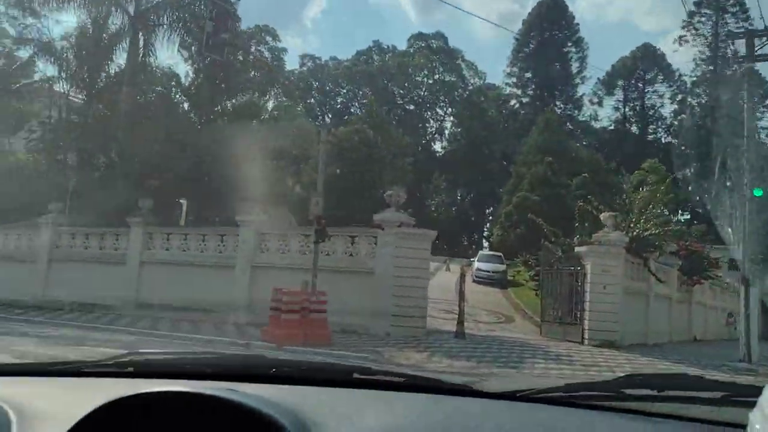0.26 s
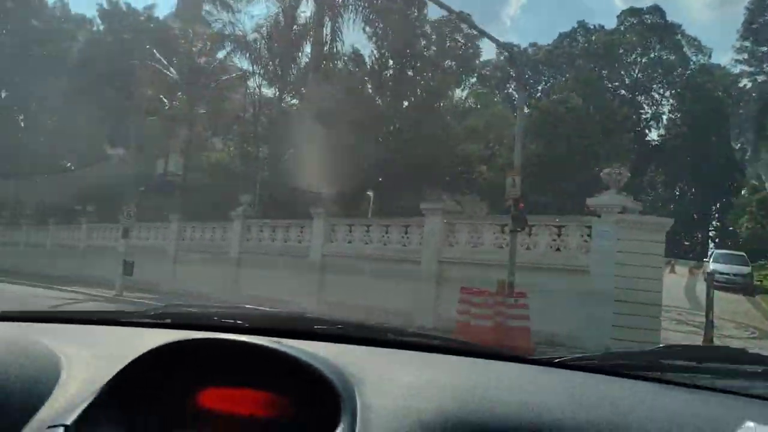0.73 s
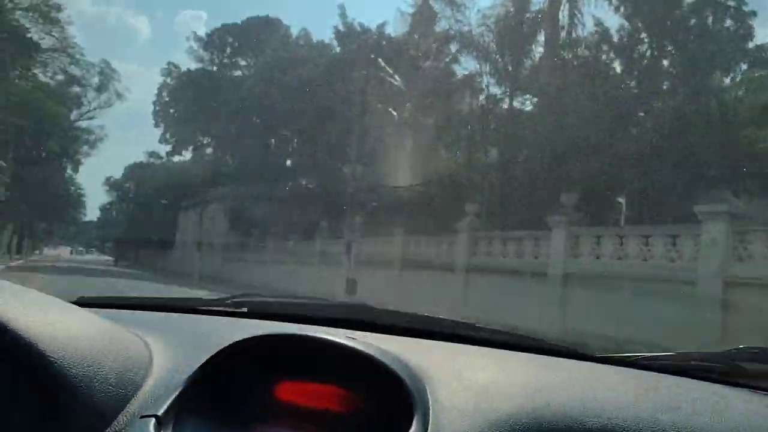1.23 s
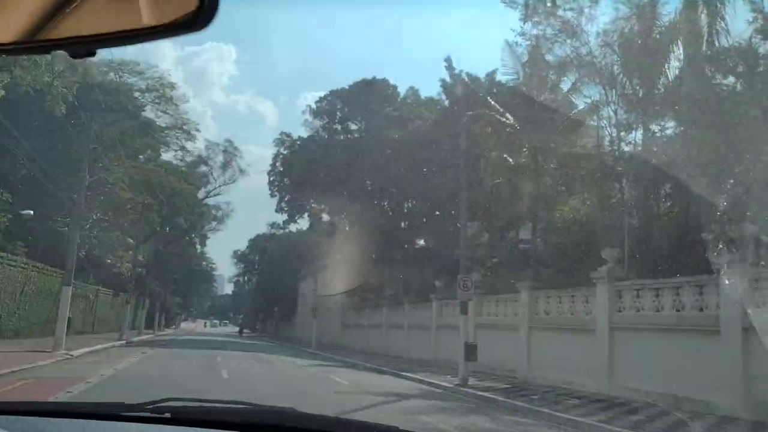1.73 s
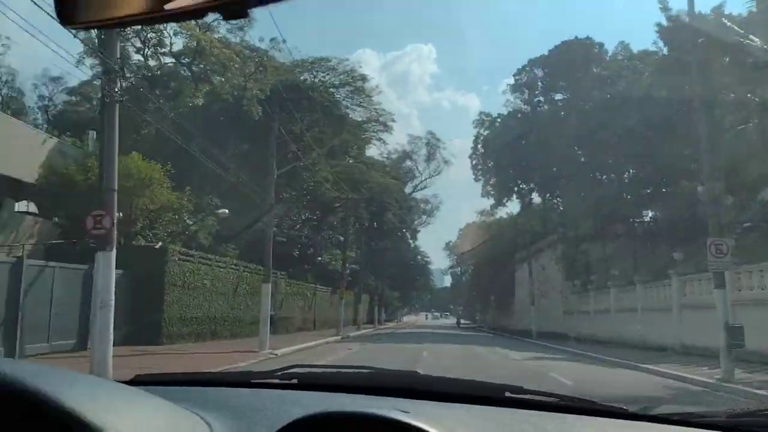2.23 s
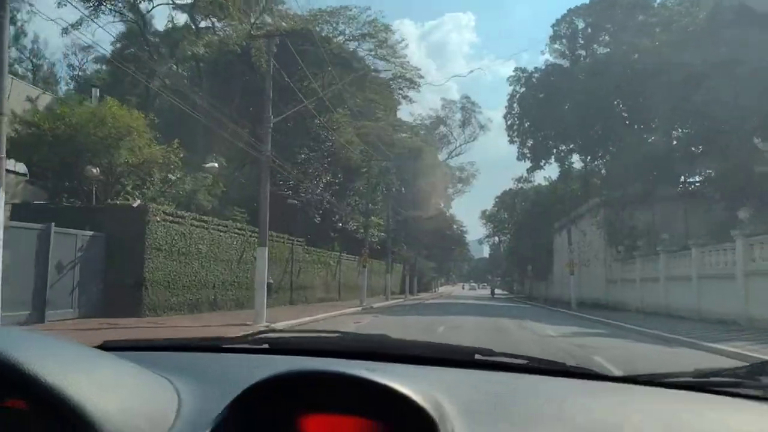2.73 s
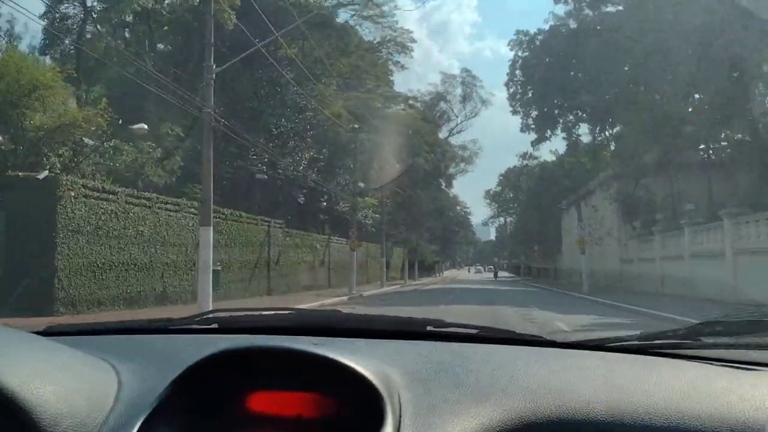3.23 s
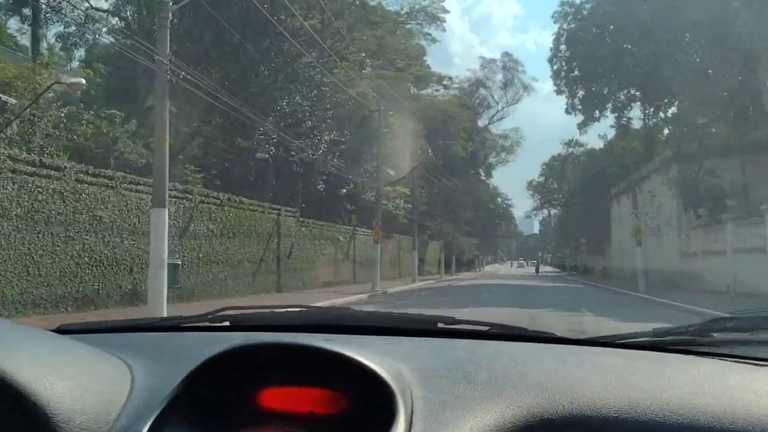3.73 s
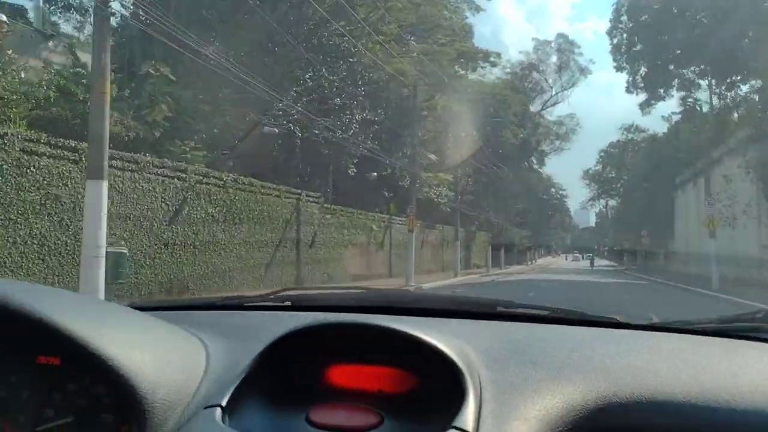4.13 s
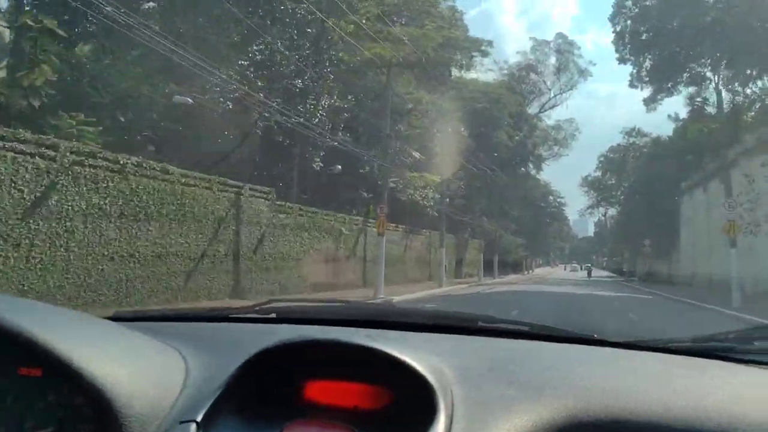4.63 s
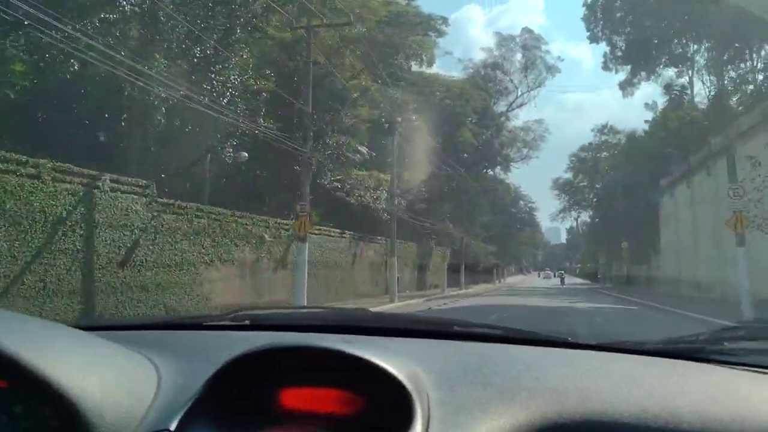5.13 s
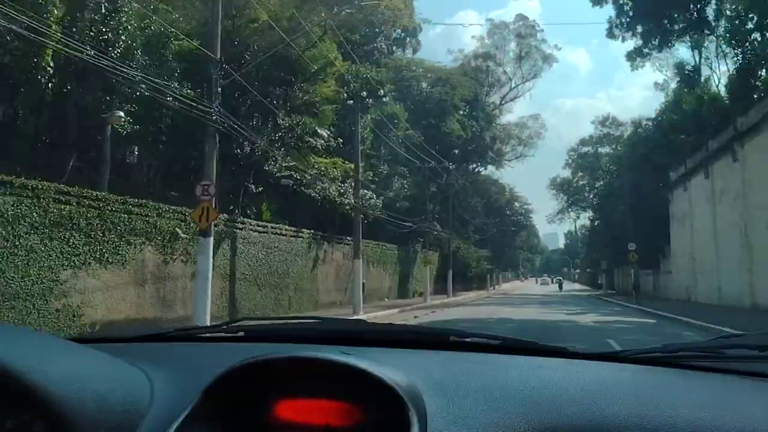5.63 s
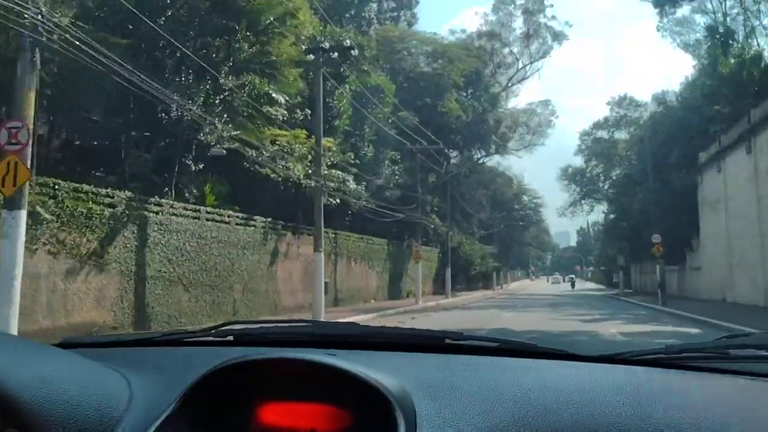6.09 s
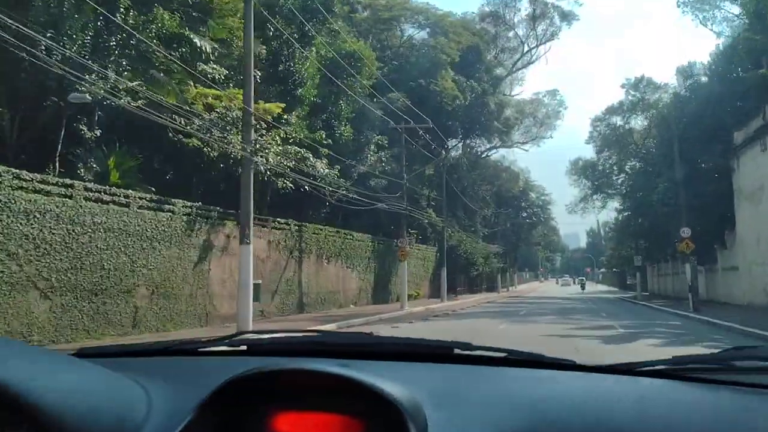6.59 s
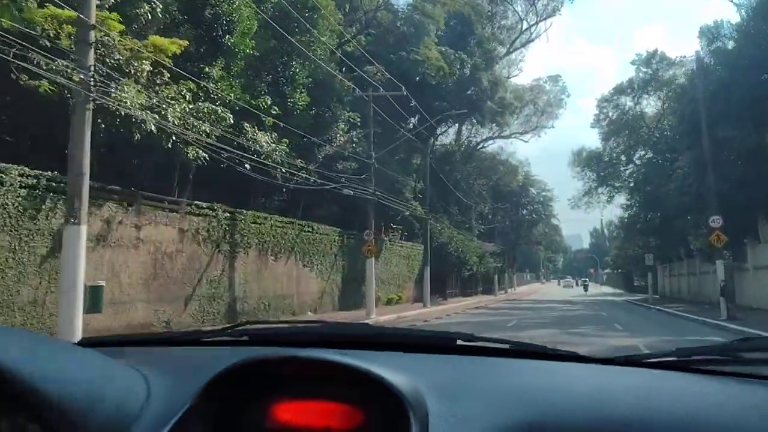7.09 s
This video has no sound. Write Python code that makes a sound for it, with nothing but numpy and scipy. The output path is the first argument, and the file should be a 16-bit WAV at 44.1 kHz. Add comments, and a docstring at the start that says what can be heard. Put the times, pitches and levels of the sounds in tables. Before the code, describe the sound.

Close, boomy cabin sound of a four-cylinder car with a loud open exhaust. Low lugging burble first, small plastic ticks and a soft bump, then a smooth rise in revs, easing briefly midway before a hard, rasping pull. Loose panels buzz at the peak, the gas hiss drops away, and the engine hums on high, ending with several thuds and a stumble.

```python
"""A four-cylinder car with a straight-through exhaust, heard on a phone inside the cabin.
It lugs through a corner, then pulls up through the revs with rising rasp and hiss until the throttle eases.
Firing orders are swept sines shaped by the cabin; exhaust notes are filtered pulses and pulsing noise.
Gas, burble, body rumble and tyres are coloured noise; trim ticks, and bumps thud and shake loose panels."""
import sys
import numpy as np
from scipy import signal
from scipy.fft import rfft, irfft
from scipy.io import wavfile
from scipy.ndimage import uniform_filter1d, minimum_filter1d

SR = 44100
rng = np.random.default_rng(int(sys.argv[2]) if len(sys.argv) > 2 else 0)


def store_pcm(level_fs):
    """Save levels as 16-bit WAV."""
    pcm = np.round(np.clip(level_fs, -1, 1) * 32767).astype(np.int16)
    wavfile.write(sys.argv[1], SR, np.atleast_2d(pcm).T)


N = 324135
T = np.arange(N) / SR

# engine stumbles: boom dips, burble swells: (time [s], half length [s], burble level [dB])
ENGINE_STUMBLES = [(1.165, 0.054, -41), (6.17, 0.07, -26), (7.153, 0.12, -18.5)]
REFERENCE_HZ = 80  # firing rate from which boom and tyre levels are scaled


def undb(db):
    """Decibels to gain."""
    return 10 ** (np.asarray(db) / 20)


def unit(x):
    """Scale to rms 1."""
    return x / np.sqrt(np.mean(x ** 2))


def curve(table):
    """Join (time, value) points by straight lines."""
    time_s, value = np.transpose(table)
    return np.interp(T, time_s, value)


def colour(x, spectrum):
    """Filter by (Hz, dB) points, 12 dB per octave steeper beyond the ends; rms 1."""
    point_hz, point_db = np.transpose(spectrum)
    f = np.maximum(np.fft.rfftfreq(N, 1 / SR), 1)
    skirts = (np.minimum(f / point_hz[0], 1) * np.minimum(point_hz[-1] / f, 1)) ** 2
    gain = undb(np.interp(np.log(f), np.log(point_hz), point_db)) * skirts
    return unit(irfft(rfft(x) * gain, N))


def walk(rate_hz):
    """Smooth random drift with about rate_hz new values a second; rms 1."""
    hold = int(SR / rate_hz)
    steps = np.repeat(rng.standard_normal(N // hold + 1), hold)[:N]
    return unit(uniform_filter1d(steps, hold))


def pan(left_over_right_db):
    """Left and right gains for a level difference."""
    return undb(np.array([[left_over_right_db], [-left_over_right_db]]) / 2)


def ring(start_s, t60_s, rise_s):
    """Envelope of something knocked: quick rise, exponential decay."""
    t = np.maximum(T - start_s, 0)
    return undb(-60 * t / t60_s) * (1 - np.exp(-t / rise_s))


def rise(hz, centre_hz, width_hz):
    """Soft switch from 0 to 1 as the firing rate passes a threshold."""
    return 1 / (1 + np.exp((centre_hz - hz) / width_hz))


def swell(centre_s, half_s):
    """Bell-shaped envelope."""
    return np.exp(-((T - centre_s) / half_s) ** 2)


def ports(x, diffuse_db):
    """Direct sound reaches the right port first; scattered sound follows its loudness, unlike at each port."""
    lag_samples = 22
    loudness = np.sqrt(np.abs(uniform_filter1d(x ** 2, size=100)))
    direct = np.array([np.roll(x, lag_samples), x])
    return direct + undb(diffuse_db) * loudness * rng.standard_normal((2, N))


def cabin(x, wet_db, t60_s, lag_s, apart):
    """Short reflections off glass and seats smear pulses in time (phase only), a little differently at each port."""
    t = T[:SR // 5]
    echoes = rng.standard_normal((3, len(t))) * undb(-60 * t / t60_s)
    echoes = echoes / np.sqrt(np.sum(echoes ** 2, axis=1, keepdims=True))
    echoes = rfft(echoes, N)
    shared_turn = np.angle(1 + undb(wet_db) * echoes[0])
    port_turns = np.angle(1 + apart * echoes[1:])
    left, right = irfft(rfft(x) * np.exp(1j * (shared_turn + port_turns)), N)
    return np.array([np.roll(left, round(lag_s * SR)), right])  # right port leads


def firings(turns, scatter_db, jitter_s, cylinder_db):
    """One pulse a firing; the four cylinders differ a little, and so does every cycle."""
    times_s = np.interp(np.arange(1, int(turns[-1])), turns, T)
    chance = rng.standard_normal((len(times_s), 2))
    cylinders = np.resize([0.23, -1.03, 0.39, -0.61], len(times_s))
    size = undb(scatter_db * chance[:, 0] + cylinder_db * cylinders)
    at = np.round((times_s + jitter_s * chance[:, 1]) * SR)
    return np.bincount(np.clip(at, 0, N - 1).astype(int), size, N)


def puffs(turns, depth, grain_db):
    """Turbulence that swells once a firing and comes in small grains."""
    pulsing = 1 + depth * np.cos(2 * np.pi * turns)
    return rng.standard_normal(N) * pulsing * undb(grain_db * walk(700))


def road(hz):
    """The body rumbles on its springs; tyre roar grows with the firing rate, as they turn with the engine."""
    # body rumble, strongest in the corner: (time [s], level [dB])
    rumble_level = [(0, -41), (.3, -16.5), (1.2, -17), (1.8, -16.5), (2.7, -28), (4.2, -27), (5.3, -35),
                    (6.4, -25), (7.35, -20.5)]
    # rumble spectrum: (frequency [Hz], density [dB per Hz])
    body_spectrum = [(12, -11), (24, -5.5), (31, -1), (40, -4), (100, -19.5)]
    # tyre spectrum: (frequency [Hz], density [dB per Hz])
    tyre_spectrum = [(100, -3), (350, 6), (600, -5), (1000, -13.5), (1500, -10), (2050, -9), (3000, -17.5),
                     (6000, -31), (10000, -22.5), (15000, -33)]
    tyre_ref_db, tyre_db_per_octave = -37.5, 11.5
    tyre_db = tyre_ref_db + tyre_db_per_octave * np.log2(hz / REFERENCE_HZ)
    rumble = colour(rng.standard_normal(N), body_spectrum)
    tyres = colour(ports(rng.standard_normal(N), diffuse_db=4.5), tyre_spectrum)
    return rumble * undb(curve(rumble_level)) + tyres * undb(tyre_db + 1.4 * walk(6))


def thuds():
    """Jolts ring the cabin air as decaying sines and knock on the floor pan as noise bursts."""
    # jolts: (time [s], pitch [Hz], level before rise [dB], 60 dB decay [s])
    jolts = [(1.033, 64.5, -2.5, 0.57), (6.145, 76.6, 0, 0.15), (7.047, 75, -5.5, 0.4),
             (7.175, 88, -3.5, .14), (7.217, 292, -2.5, 0.041)]
    floor_spectrum = [(150, -7.5), (290, -1), (550, -15.0), (900, -30)]  # Hz, dB per Hz
    air, knocks = 0, 0
    for start_s, pitch_hz, db, t60_s in jolts:
        tone = np.sin(2 * np.pi * pitch_hz * (T - start_s))
        air = air + undb(db) * ring(start_s, t60_s, rise_s=0.0035) * tone
        knocks = knocks + undb(db) * ring(start_s, t60_s=0.19, rise_s=0.00056)
    floor = colour(ports(rng.standard_normal(N), diffuse_db=-0.5), floor_spectrum)
    return air + knocks * undb(-13.5) * floor


def trim(turns):
    """Plastic trim ticks as the body twists, and loose panels buzz when shaken: noise under knock envelopes."""
    # ticks: (time [s], level before rise [dB], 60 dB decay [s])
    tick_events = [(0.638, -23.5, 0.017), (.864, -35, 0.041), (0.877, -32.5, 0.036), (1.032, -29.5, 0.073),
                   (1.357, -25.5, 0.084), (7.045, -32, 0.04)]
    # panel buzzes: (time [s], level before rise [dB], 60 dB decay [s], rise [s])
    buzz_events = [(1.36, -35, 0.37, 0.0028), (5.89, -8, 0.73, 0.088), (5.955, -12, 0.099, 0.019),
                   (7.109, -24, 0.38, 0.0036), (7.212, -15.5, 0.36, 0.019)]
    # trim spectrum: (frequency [Hz], density [dB per Hz])
    trim_spectrum = [(300, -13), (900, -6), (1600, 0.5), (2200, -1), (3000, -6), (4200, -6.5), (6500, -12),
                     (10000, -9.5), (15000, -27)]
    ticks = sum(undb(db) * ring(s, t60_s, rise_s=0.0002) for s, db, t60_s in tick_events)
    shake = sum(undb(db) * ring(s, t60_s, rise_s) for s, db, t60_s, rise_s in buzz_events)
    buzz = colour(ports(puffs(turns, depth=0.075, grain_db=0.5), diffuse_db=2.5), trim_spectrum)
    plastic = colour(rng.standard_normal((2, N)), trim_spectrum)
    return ticks * plastic * pan(2.2) + shake * buzz


def gas(turns, throttle):
    """Gas rushes louder as the throttle opens, fluttering with the firings; brighter at the right port."""
    # rush spectrum: (frequency [Hz], density [dB per Hz])
    gas_spectrum = [(700, -0.5), (1500, -1.5), (2200, 3.5), (3000, -2), (4000, 0), (5100, -6), (6300, -4.5),
                    (7300, -6.5), (8800, -1.5), (10400, 3.5), (12000, -3.5), (15500, -14.5)]
    shut_db, opening_db = -45.5, 19  # throttle shut; added when wide open
    flow = colour(ports(puffs(turns, depth=0.049, grain_db=1.5), diffuse_db=9.5), gas_spectrum)
    top = signal.sosfilt(signal.butter(1, 6000, "high", fs=SR, output="sos"), flow)
    flow = flow + (pan(-6) - 1) * top
    return flow * undb(shut_db + opening_db * throttle + 0.74 * walk(25))


def burble(turns, lugging):
    """Uneven combustion fills the gaps between orders with noise when the engine lugs or stumbles."""
    # shared part's spectrum: (frequency [Hz], density [dB per Hz])
    pipe_spectrum = [(30, -9), (60, 5.5), (110, 10.5), (270, 0.5), (330, -2.5), (400, -8.5), (700, -28)]
    apart_spectrum = [(180, -12), (280, 10.5), (350, -19.5), (450, -12)]  # Hz, dB per Hz
    smooth_db, lug_db = -34, 10.5  # running smoothly; added when lugging
    shared = colour(puffs(turns, depth=0.36, grain_db=-4), pipe_spectrum)
    apart = colour(rng.standard_normal((2, N)), apart_spectrum)  # differs between the ports
    stumbling = sum(undb(db) * swell(s, half_s) for s, half_s, db in ENGINE_STUMBLES)
    return (shared + undb(-1.5) * apart) * (undb(smooth_db + lug_db * lugging) + stumbling)


def exhaust(hz, turns, throttle, lugging, bark_db):
    """Firings growl when lugging or coasting, bark when pulling; at high revs their fronts ring the thin pipe."""
    # growl spectrum: (frequency [Hz], density [dB per Hz])
    growl_spectrum = [(300, 5), (360, -6), (440, 0), (505, 5), (570, -15.5), (650, -9), (1000, -30)]
    # bark spectrum: (frequency [Hz], density [dB per Hz])
    bark_spectrum = [(330, -10.5), (440, 4.5), (510, -5), (600, 6), (700, -1), (860, -4), (1100, -10.5),
                     (1500, -26)]
    # pipe wall rasp spectrum: (frequency [Hz], density [dB per Hz])
    rasp_spectrum = [(750, -10), (900, -7), (1100, -0.5), (1300, 5), (1490, 0.5), (1700, -12), (2150, -10),
                     (3100, -37), (4000, -13.5), (5500, -26)]
    # whistle spectrum: (frequency [Hz], density [dB per Hz])
    whistle_spectrum = [(1200, -2.5), (1370, 1), (1430, 9), (1500, -7), (1700, -20)]
    growl_db, growl_lug_db = 2.5, 2  # relative to bark; added when lugging
    rasp_shut_db, rasp_opening_db = -43, 17  # throttle shut; added when wide open
    racing = rise(hz, centre_hz=90.1, width_hz=1.9)
    pulling = rise(hz, centre_hz=61.8, width_hz=2.9) * (1 - racing * (1 - throttle))

    even = 1 / np.sqrt(hz)  # equal power at every firing rate
    blows = unit(even * firings(turns, scatter_db=2.0, jitter_s=.00003, cylinder_db=-1.0))
    rough = unit(puffs(turns, depth=0.21, grain_db=-0.5)) * hz / hz.mean()  # faster gas is rougher
    blows = cabin(blows + undb(-8) * rough, wet_db=8, t60_s=.05, lag_s=.0003, apart=.5)

    growl_noise = ports(unit(puffs(turns, depth=0.45, grain_db=4.0)), diffuse_db=-3)
    growl = colour(blows + undb(-7) * growl_noise, growl_spectrum)
    growl = growl * undb(growl_db + growl_lug_db * lugging)
    note = (1 - pulling) * growl + pulling * colour(blows, bark_spectrum)

    fronts = even * firings(turns, scatter_db=1.2, jitter_s=.00001, cylinder_db=1.5)
    fronts = cabin(fronts, wet_db=1, t60_s=.025, lag_s=.00052, apart=.6)
    rasp = colour(fronts, rasp_spectrum) * undb(2 * walk(14))
    rasp = racing * rasp * undb(rasp_shut_db + rasp_opening_db * throttle)

    # faint wavering whistle once the engine runs freely
    whistle = colour(ports(rng.standard_normal(N), diffuse_db=-16.0), whistle_spectrum)
    whistle = unit(whistle * undb(3.6 * walk(25)))
    whistle = whistle * rise(hz, centre_hz=59.2, width_hz=0.77) * undb(-44)
    return note * undb(bark_db) + rasp + whistle


def boom(hz, turns, bark_db):
    """Low firing orders sweep through the cabin's standing waves; harder firings favour the upper ones."""
    # orders 1 to 6: (reference level before cabin response [dB], slope [dB per octave of revs],
    # slope [dB per dB of bark], level change in a stumble [dB])
    firing_orders = [(-8, 3.7, -0.24, -10.5), (-11.5, 15, 0.21, -9.5), (-6, 4.5, .5, -6.5),
                     (-9, 7, 0.68, -6), (-12, -12, 0.54, 2), (-17.5, -12.5, .87, -24)]
    # cabin response: (frequency [Hz], gain [dB])
    cabin_response = [(51, -16), (54, -4), (68, -1.5), (84, 1.5), (98, -5.5), (110, -3), (140, -3.5),
                      (165, -14.5), (192, -22), (210, -15), (245, -13.5), (280, -16.5), (322, -18),
                      (380, -33), (415, -27.5)]
    # standing waves at the two ports: (frequency [Hz], left minus right [dB], left lead [rad])
    port_waves = [(60, -1.1, 0), (105, -1.2, -.12), (165, 2.2, -.15), (220, 3.5, .1), (290, 2.4, .3),
                  (330, 3, .9), (410, 2.5, 2.2), (520, -1.5, 0)]
    reference_bark_db, waver_db, spread_rad = -35, 0.5, .3
    port_hz, balance_db, lead_rad = np.transpose(port_waves)
    cabin_hz, cabin_db = np.transpose(cabin_response)
    stumble = sum(swell(s, half_s) for s, half_s, _ in ENGINE_STUMBLES)
    sides = np.array([[1], [-1]]) / 2
    out = 0
    for k, (db, per_octave, per_bark, stumble_db) in enumerate(firing_orders, 1):
        db = db + per_octave * np.log2(hz / REFERENCE_HZ)
        db = db + per_bark * (bark_db - reference_bark_db) + stumble_db * stumble
        db = db + np.interp(np.log(k * hz), np.log(cabin_hz), cabin_db)
        db = db + np.sqrt(k) * waver_db * walk(22)
        if k == 3:  # flares as the throttle shuts
            db = db + 13 * swell(6.07, half_s=0.12)
        db = db + sides * np.interp(k * hz, port_hz, balance_db)
        phase = 2 * np.pi * k * turns - spread_rad * k ** 2  # higher orders arrive a little later
        phase = phase + sides * np.interp(k * hz, port_hz, lead_rad)
        out = out + undb(db) * np.sqrt(2) * np.cos(phase)
    return out


def scene():
    """Revs and throttle drive the engine, road and cabin sounds, summed."""
    # engine speed: (time [s], firing rate [Hz])
    revs = [(0.0, 58.96), (0.48, 56.86), (0.82, 53.66), (1.02, 54.76), (1.35, 51.75), (1.62, 51.86),
            (1.71, 54.73), (2.43, 60.59), (3.02, 68.05), (3.45, 72.55), (3.81, 74.93), (4.3, 80.87),
            (4.84, 89.97), (5.24, 97.2), (5.83, 109), (5.96, 106.6), (6.36, 107.9), (7.35, 103.1)]
    # exhaust bark: (time [s], level [dB])
    bark_level = [(0, -48), (.45, -47), (1.3, -33), (2.1, -29.5), (2.6, -38), (3.0, -48.5), (3.4, -42),
                  (3.75, -37.5), (4.05, -35.5), (4.37, -41.5), (4.6, -28.5), (4.95, -27.5), (5.25, -31),
                  (6.1, -29.5), (6.65, -31.5), (7.35, -29)]
    # throttle: (time [s], opening [0-1])
    throttle_opening = [(0, .09), (1.3, 0.13), (1.6, 0.55), (2.5, 0.42), (3.05, 0.25), (3.45, 0.29),
                        (3.85, 0.09), (4.35, 0.51), (4.58, 0.81), (4.85, 0.71), (5.3, 0.87), (6.03, 1),
                        (6.15, 0.14), (6.33, 0.06), (7.1, 0.16), (7.35, 0.4)]
    hz, bark_db = curve(revs), curve(bark_level)
    throttle = curve(throttle_opening).clip(0, 1)
    lugging = 1 - rise(hz, centre_hz=55.6, width_hz=2.3)
    turns = np.cumsum(hz) / SR  # one turn a firing
    background = road(hz) + thuds() + trim(turns)
    flow = gas(turns, throttle) + burble(turns, lugging)
    return background + flow + exhaust(hz, turns, throttle, lugging, bark_db) + boom(hz, turns, bark_db)


def record(dry):
    """The phone's limiter ducks the loudest peaks on both channels; the top is cut above 15.7 kHz."""
    ceiling, window_samples = np.sqrt(.5), 1200
    need = np.minimum(1, ceiling / np.maximum(np.abs(dry).max(axis=0), 1e-9))
    gain = uniform_filter1d(minimum_filter1d(need, size=window_samples), size=window_samples)
    return signal.sosfilt(signal.ellip(10, .1, 80, 15700, fs=SR, output="sos"), dry * gain)


dry = scene()
out = record(dry)
store_pcm(out)
```